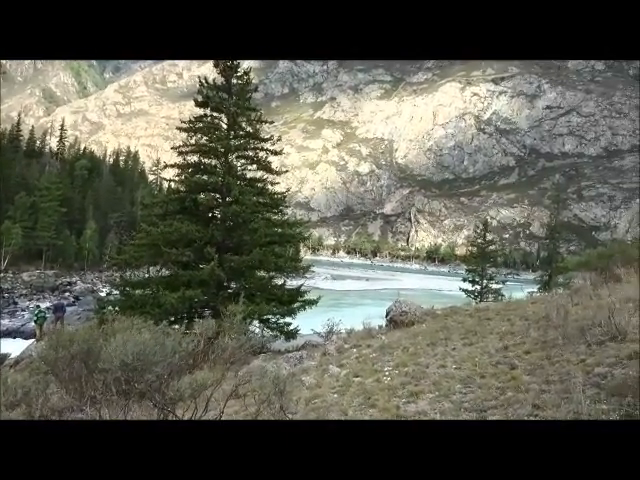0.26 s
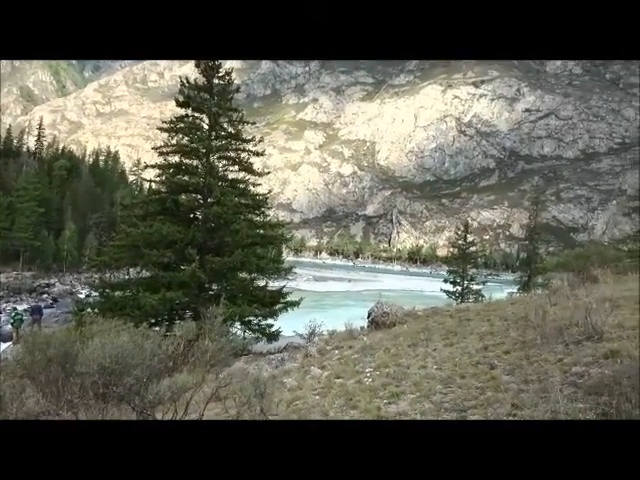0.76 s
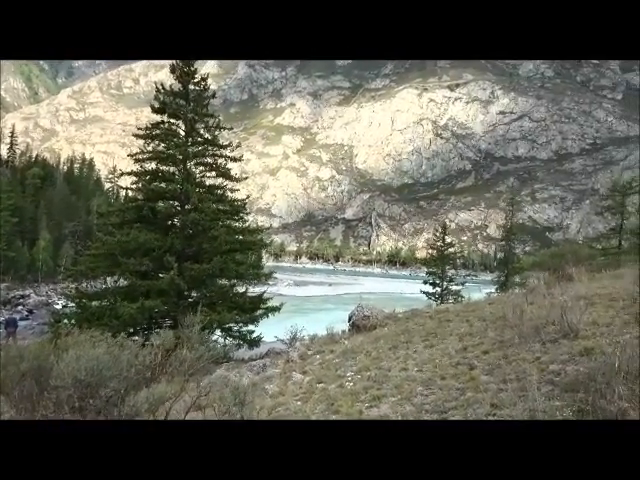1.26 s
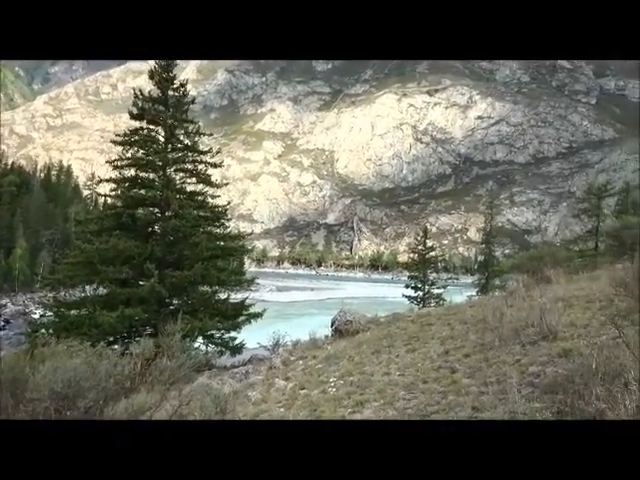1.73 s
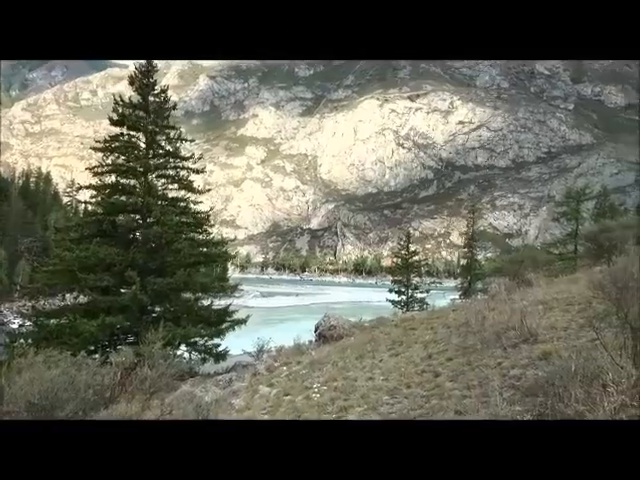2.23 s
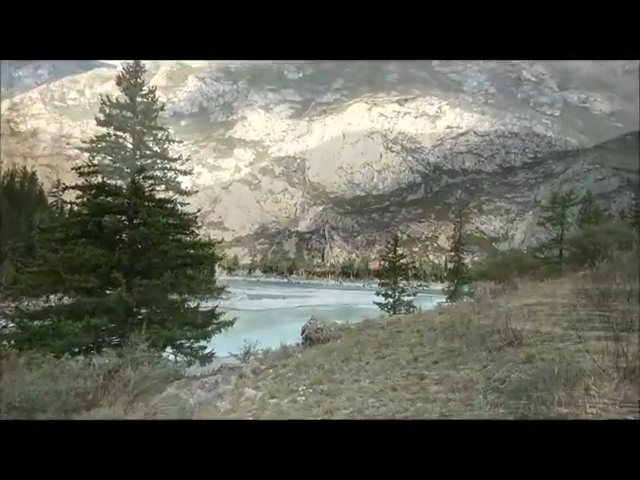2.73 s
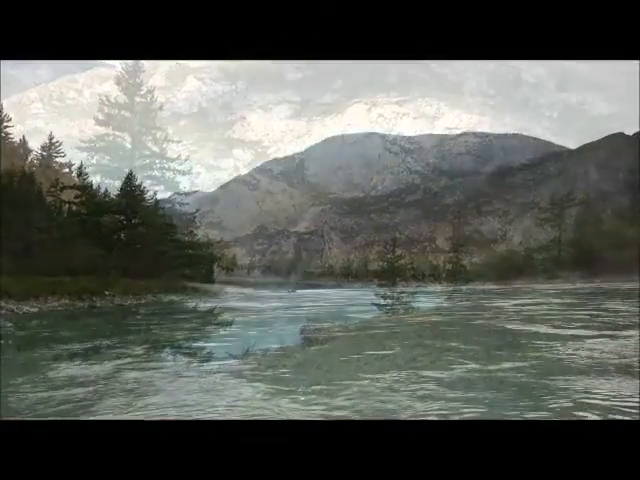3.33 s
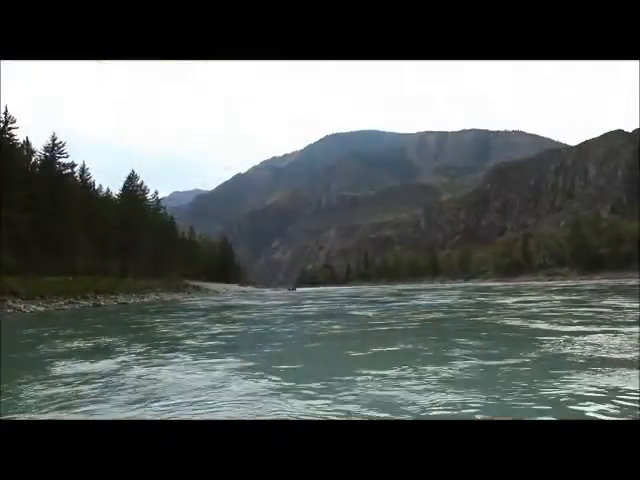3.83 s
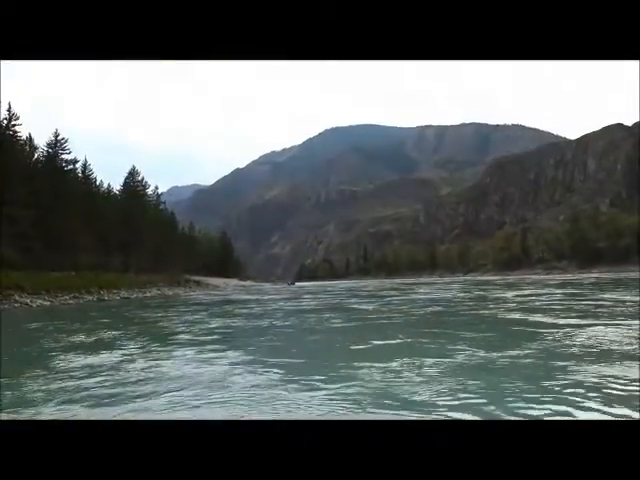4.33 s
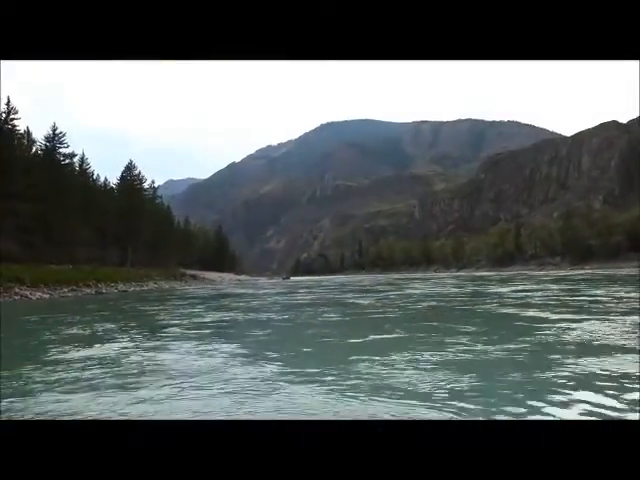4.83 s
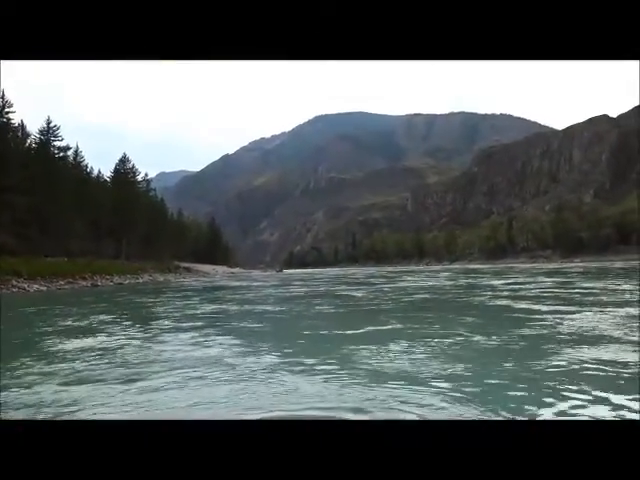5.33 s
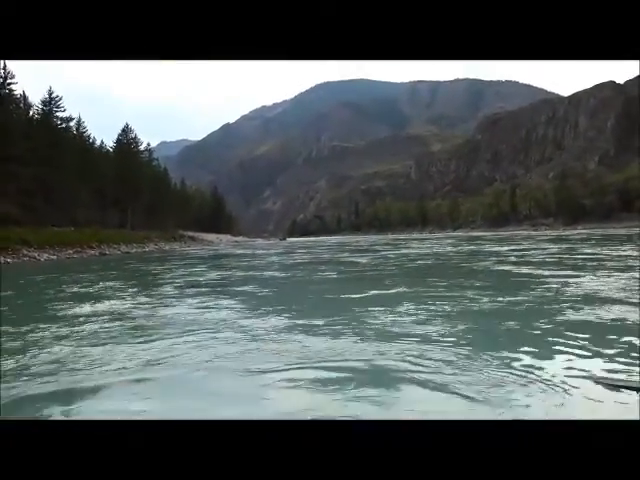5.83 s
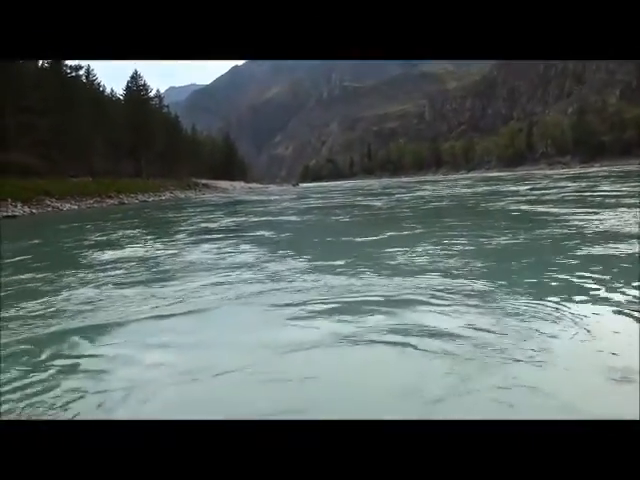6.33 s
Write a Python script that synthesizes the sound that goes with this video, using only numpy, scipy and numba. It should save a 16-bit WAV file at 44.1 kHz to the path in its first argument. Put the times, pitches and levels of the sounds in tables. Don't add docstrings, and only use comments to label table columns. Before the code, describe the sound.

A loud, smooth roar of river rapids cuts abruptly to quiet murmuring water with soft knocks and drips, then a paddle-like stroke slaps and splashes.

```python
import sys
import numpy as np
from scipy import signal
from scipy.fft import rfft, irfft, next_fast_len
from scipy.io import wavfile
from scipy.ndimage import uniform_filter1d
from numba import njit

SR = 44100
rng = np.random.default_rng(int(sys.argv[2]) if len(sys.argv) > 2 else 0)


def generate_wav(sig):
    pcm = np.round(np.clip(np.atleast_2d(sig).T, -1, 1) * 32767).astype(np.int16)
    wavfile.write(sys.argv[1], SR, pcm)


def natural_amplitude(level_db):
    exponent = np.asarray(level_db, float) / 20
    return 10 ** exponent


N = 289719
CUT_S = 3.879


def unit(x):
    return x / np.sqrt(np.mean(x ** 2))


def over_hz(table, hz):
    f, v = np.transpose(table)
    return np.interp(np.log(hz + 1), np.log(f + 1), v)


def panned(x, pan_db):
    return np.array([x * natural_amplitude(pan_db / 2), x * natural_amplitude(-pan_db / 2)])


def walk(rate, size):
    hold = int(SR / rate)
    steps = np.repeat(rng.standard_normal(size // hold + 1), hold)
    smooth = uniform_filter1d(uniform_filter1d(steps, hold), hold)
    return unit(smooth[:size])


@njit
def rings(size, start, hz, cycles, glide, gain):
    out = np.zeros(size)
    for k in range(len(start)):
        w = 2 * np.pi * hz[k] / SR
        fade = np.exp(-hz[k] / cycles[k] / SR)
        length = min(int(5 * cycles[k] * SR / hz[k]), size - start[k])
        phasor = gain[k] + 0j
        advance = fade * np.exp(1j * w)
        bend = np.exp(1j * w * glide[k] / (length + 1))
        for i in range(length):
            out[start[k] + i] += phasor.imag
            phasor *= advance
            advance *= bend
    return out


def froth(size, rate, low_hz, top_hz, turns, scatter_db):
    when, pitch, luck = rng.random((int(rate * size / SR), 3)).T
    start = (when * size).astype(np.int64)
    hz = low_hz * (top_hz / low_hz) ** pitch
    gain = hz / 1000 * natural_amplitude(-scatter_db * np.log(1 - luck))
    return unit(rings(size, start, hz, turns + 0 * hz, 0.38 + 0 * hz, gain))


def water(source, colour, pan, side_db, ripple_db, air_db, swell_db, patchy_db, flicker_db):
    size = len(source)
    hz = np.arange(size // 2 + 1) * SR / size
    mid = rfft(source)
    side = rfft(rng.standard_normal(size)) * natural_amplitude(side_db(hz))
    tilt = natural_amplitude(over_hz(pan, hz) / 2)
    pair = np.array([(mid + side) * tilt, (mid - side) / tilt]) * natural_amplitude(over_hz(colour, hz))
    power = np.mean(irfft(pair.mean(axis=0), size) ** 2)
    band = 2 * np.log2(hz / 25 + 1e-9)
    swell, shared = walk(3, size), walk(6, size)
    out = 0
    for k in range(20):
        window = np.clip(1 - np.abs(np.clip(band, 0, 19) - k), 0, 1)
        shared = .8 * shared + .6 * walk(6, size)
        air = np.clip((k - 15) / 2, 0, 1)
        ripple = np.clip((k - 11) / 2, 0, 1) - air
        db = swell_db * swell + patchy_db * shared + flicker_db * walk(20, size)
        db = db + ripple * ripple_db + air * air_db
        out = out + natural_amplitude(db) * irfft(pair * window, size)
    return out / np.sqrt(power)


# frequency in Hz, density in dB per Hz.
RAPIDS_COLOUR = [(12, -51), (20, -21), (80, -4), (140, 0.2), (191, -2), (274, -7), (533, -2), (880, -3),
                 (1820, -11.5), (2550, -12.5), (3200, -16), (5680, -20), (10200, -31), (14200, -46),
                 (15500, -57)]
# frequency in Hz, left minus right in dB.
RAPIDS_PAN = [(150, 0), (200, 0.2), (290, 1.4), (380, 1), (700, 1.5), (1290, 4.5), (2380, 4), (3200, 4),
              (5000, 2.3), (7600, 2.3), (10500, 0.5), (15000, 0.5)]
# frequency in Hz, likeness from 0 to 1.
RAPIDS_LIKE = [(25, .98), (60, 1.0), (130, 1.0), (290, 1), (640, 0.98), (1410, 0.99), (3100, 0.95),
               (5000, 0.99), (7600, 0.84), (15000, 0.92)]
RAPIDS_DB = -25


def rapids():
    length = int(CUT_S * SR)
    size = next_fast_len(length)
    bubbles = froth(size, 12000, 300., 6000., turns=4.0, scatter_db=1.2)
    source = rng.standard_normal(size) + natural_amplitude(-21.5) * bubbles

    def apart_db(hz):
        return 10 * np.log10(np.clip((1 - over_hz(RAPIDS_LIKE, hz)) / 2.8, 8e-4, 1))

    roar = water(source, RAPIDS_COLOUR, RAPIDS_PAN, apart_db, 0, 0,
                 swell_db=.25, patchy_db=.4, flicker_db=.4)
    return (roar * natural_amplitude(RAPIDS_DB))[:, :length]


# frequency in Hz, density in dB per Hz.
SPLASH_COLOUR = [(180, -31), (300, 7.5), (383, -21), (416, -14), (482, 1), (1230, -4.5), (1650, -2.5),
                 (1880, -5), (3500, -12), (6950, -18.5), (15000, -28)]
ENTER_S, FULL_S, LEAVE_S = 6.108, 6.235, 6.352
ENTER_DB, FULL_DB, TRICKLE_DB = -52.5, -44, -52.5
BITE_S, RELEASE_S, TRICKLE_S = .006, .04, .06
STROKE_PAN_DB = 2.5


def splash():
    released_s = LEAVE_S + RELEASE_S
    times = [ENTER_S - BITE_S, ENTER_S, FULL_S, LEAVE_S, released_s, released_s + TRICKLE_S]
    shape_db = [ENTER_DB - 10.5, ENTER_DB, FULL_DB, FULL_DB, TRICKLE_DB, TRICKLE_DB - 1]
    first = int(times[0] * SR)
    size = int((times[-1] - times[0]) * SR) // 2 * 2
    level_db = np.interp((first + np.arange(size)) / SR, times, shape_db)
    colour = natural_amplitude(over_hz(SPLASH_COLOUR, np.arange(size // 2 + 1) * SR / size))
    bubbles = froth(size, 4000, 500., 9000., turns=3., scatter_db=2.0)
    fizz = rng.standard_normal(size) + natural_amplitude(-3) * bubbles
    mid = unit(irfft(rfft(fizz) * colour, size))
    side = unit(irfft(rfft(rng.standard_normal(size)) * colour, size))
    spray = panned(mid, STROKE_PAN_DB) + natural_amplitude(-11) * np.array([side, -side])
    out = np.zeros((2, N))
    out[:, first:first + size] = spray * natural_amplitude(level_db + walk(90, size))
    return out


# start in seconds, starting pitch in Hz, level in dB.
POCKETS = [(6.200, 540, -43.5), (6.200, 1350, -49), (6.212, 720, -41), (6.190, 950, -51), (6.232, 700, -47),
           (6.241, 930, -45), (6.250, 614, -44.5), (6.250, 1060, -46), (6.246, 1600, -50),
           (6.264, 1250, -40), (6.272, 1330, -43), (6.268, 1900, -47), (6.289, 1540, -44),
           (6.294, 1620, -44), (6.285, 820, -48), (6.300, 900, -49), (6.321, 1050, -48), (6.336, 604, -50),
           (6.355, 480, -44), (6.350, 2500, -53), (6.372, 330, -48), (6.406, 453, -45.5)]
POCKET_S, RISE_HZ_PER_S = 0.025, 11600


def pockets():
    t, out = np.arange(N) / SR, np.zeros((2, N))
    for s, from_hz, db in POCKETS:
        part = slice(int(s * SR), int((s + POCKET_S) * SR))
        closed = np.clip((t[part] - s) / POCKET_S, 0, 1)
        rough = 1 + .035 * walk(262, len(closed))
        hz = (from_hz + RISE_HZ_PER_S * POCKET_S * closed) * rough
        tone = np.sin(2 * np.pi * np.cumsum(hz) / SR)
        swell = natural_amplitude(db + 3.5 * walk(400, len(closed))) * np.sin(np.pi * closed ** .7)
        out[:, part] += panned(swell * tone, STROKE_PAN_DB)
    return out


def taps(table, t60, rise, crack_db, push_s):
    s, db, hz, pan_db = np.transpose(table)
    start = (s * SR).astype(np.int64)
    one = np.ones(len(s))
    cycles = hz * t60 / np.log(1000)
    push = np.hanning(int(push_s * SR) + 3)
    push = push / push.sum()
    ports = []
    for side in (1, -1):
        port_db = db + side * pan_db / 2
        ring = rings(N, start, hz, cycles, rise * one, natural_amplitude(port_db))
        crack = rings(N, start, 2.0 * hz, 2.8 * one, rise * one, natural_amplitude(port_db + crack_db))
        ports.append(np.convolve(ring + crack, push)[:N])
    return np.array(ports)


# start in seconds, peak in dB, pitch in Hz,
# left minus right in dB.
SLAP = [
    (6.2232, -22, 1150, 2),
]


def slap():
    return -taps(SLAP, 0.0045, .2, -21, 0)


# start in seconds, peak in dB, pitch in Hz, left minus right in dB.
KNOCKS = [(4.310, -33, 397, -2), (4.403, -37, 750, 0), (4.439, -46, 400, -2), (4.460, -30, 337, -1),
          (4.601, -33, 549, 1), (4.714, -43, 350, 0), (4.812, -44, 361, 0), (5.036, -35, 342, 0),
          (5.255, -44, 380, 0), (5.260, -31, 800, -1), (5.617, -45, 312, 0), (5.724, -49, 347, 0),
          (5.760, -41, 380, -2), (5.798, -45, 444, 0), (5.840, -42, 374, 0)]


def knocks():
    return taps(KNOCKS, 0.021, .05, -6, 0.0016)


# start in seconds, peak in dB, pitch in Hz, left minus right in dB.
DRIPS = [(4.207, -53, 2300, 2), (4.211, -56, 3500, 2), (4.309, -49, 1890, 1), (4.335, -56, 3100, 1),
         (4.459, -42, 1090, -1), (4.458, -53, 1900, -1), (4.925, -49, 1800, -1), (5.797, -52, 2880, -1),
         (6.101, -43, 1500, 3), (6.159, -37, 1460, 3), (6.160, -51, 3500, 3), (6.499, -50, 3600, 3),
         (2.903, -56, 14200, 0), (2.911, -54, 12800, 0), (2.918, -56, 13900, 0), (2.926, -56, 14600, 0),
         (2.921, -53, 12200, 0), (2.908, -56, 13400, 0), (5.779, -62, 5300, 0), (6.160, -46, 2100, 3),
         (6.224, -49, 3000, 2), (6.226, -50, 4200, 2), (4.208, -59, 4100, 2), (4.311, -57, 3600, 1),
         (5.757, -62, 7600, 0), (6.330, -57, 4700, 9)]


def drips():
    return taps(DRIPS, 0.018, 0.18, -14, 0)


# start in seconds, starting pitch in Hz, final pitch in Hz,
# fall time in seconds, level in dB, left minus right in dB.
CHIP = (5.8, 8500, 6800, .0026, -53.5, 1)
BANK_T60_S, BANK_DB = .5, -30


def bird():
    s, from_hz, to_hz, fall, db, pan_db = CHIP
    t = np.arange(int(.011 * SR)) / SR
    hz = to_hz + (from_hz - to_hz) * np.exp(-t / fall)
    chip = np.sin(2 * np.pi * np.cumsum(hz) / SR) * np.sin(np.pi * (t / t[-1]) ** .6)
    lag = np.arange(SR // 4) / SR
    ahead, apart = rng.standard_normal((2, len(lag))) * natural_amplitude(-60 * lag / BANK_T60_S + BANK_DB)
    echo = np.array([ahead + .35 * apart, ahead - .35 * apart])
    echo[:, 0] = natural_amplitude([pan_db / 2, -pan_db / 2])
    heard = signal.fftconvolve(chip[None], echo, axes=1)
    first, out = int(s * SR), np.zeros((2, N))
    out[:, first:first + heard.shape[1]] = natural_amplitude(db) * heard
    return out


# frequency in Hz, density in dB per Hz.
CALM_COLOUR = [(12, -41), (20, -22), (49, -17.5), (129, -4.5), (297, -2.5), (342, -2.5), (427, -3.5),
               (685, -7), (788, -7), (1070, -14.5), (1720, -23), (1920, -22.5), (4070, -29.5), (5840, -29),
               (15500, -27.5)]
# frequency in Hz, left minus right in dB.
CALM_PAN = [(60, -0.5), (110, -0.5), (200, 0.27), (380, 0.0), (700, -0.3), (1290, 1.0), (2380, -1.0),
            (4400, -0.73), (8120, -1.0), (15000, 0.0)]
# frequency in Hz, side minus mid in dB.
CALM_SIDE = [(60, -13), (110, -14), (200, -13), (380, -9.5), (700, -6.5), (1290, 0.5), (2380, -4.5),
             (4400, -3.5), (8120, -1), (15000, -17)]
# time in seconds, level in dB about the usual.
DRIFT = [(3.88, 2.2), (4.05, 0.2), (4.16, -0.2), (4.35, 0), (4.62, -1), (4.9, 0.75), (5.15, -0.4),
         (5.45, 0.4), (5.7, -0.4), (6.09, 1), (6.2, 0.7), (6.57, 4.5)]
# frequency in Hz, width in Hz, gain in dB.
LAPPING = [(885, 43, 2), (1120, 240, 4.5), (1350, 100, -1.5), (1553, 90, 5.5), (1860, 76, 1.5),
           (2170, 110, 1), (2500, 140, -0.5), (3200, 200, 1.5), (3770, 500, -3)]
CALM_DB, RIPPLE_DB, RIPPLE_PER_DB = -49, -1, 4.5
RIPPLE_TOP_DB = .6
HISS_DB, HISS_EXTRA_DB, HISS_SETTLE_S = -4.5, 3.5, 0.2
WAVELET_S, WAVELET_LENGTH_S, WAVELET_DB = 4.64, 0.19, 2


def current(size):
    since = np.arange(size) / SR
    t = CUT_S + since
    effort_db = np.interp(t, *np.transpose(DRIFT))
    ripple_db = RIPPLE_DB + RIPPLE_PER_DB * np.minimum(effort_db, RIPPLE_TOP_DB)
    ripple_db = ripple_db + WAVELET_DB * np.exp(-((t - WAVELET_S) / WAVELET_LENGTH_S) ** 4)
    hiss_db = HISS_DB - effort_db + HISS_EXTRA_DB * np.exp(-since / HISS_SETTLE_S)
    hz = np.arange(size // 2 + 1) * SR / size
    hollow_db = sum(db / (1 + ((hz - f) / width * 2) ** 2) for f, width, db in LAPPING)
    source = irfft(rfft(rng.standard_normal(size)) * natural_amplitude(hollow_db), size)
    murmur = water(source, CALM_COLOUR, CALM_PAN, lambda hz: over_hz(CALM_SIDE, hz), ripple_db, hiss_db,
                   swell_db=.15, patchy_db=.35, flicker_db=1.2)
    return murmur * natural_amplitude(CALM_DB + effort_db)


def scene():
    loud = rapids()
    rest = N - loud.shape[1]
    calm = current(next_fast_len(rest) // 2 * 2 + 2)[:, :rest]
    bed = np.concatenate([loud, calm], axis=1)
    return bed + splash() + pockets() + slap() + knocks() + drips() + bird()


def roll_off(x):
    return signal.sosfilt(signal.butter(12, 15620, fs=SR, output="sos"), x)


def record(dry):
    top = signal.ellip(12, .3, 70, 14960, fs=SR, output="sos")
    cut = int(CUT_S * SR)
    parts = [signal.sosfilt(top, part) for part in (dry[:, :cut], dry[:, cut:])]
    return roll_off(np.concatenate(parts, axis=1))


dry = scene()
out = record(dry)
generate_wav(out)
```